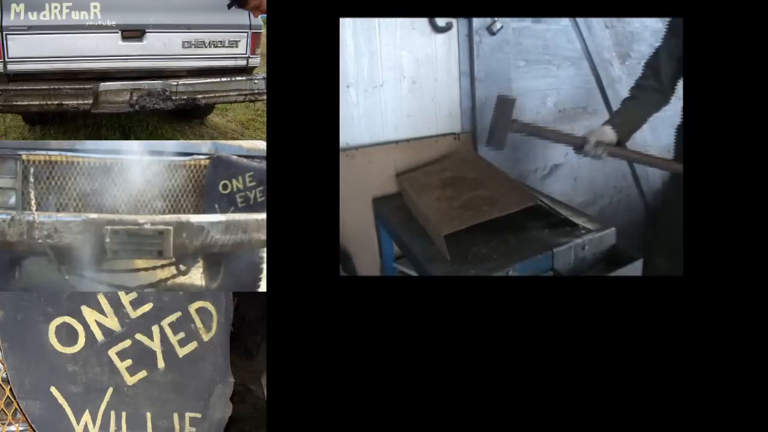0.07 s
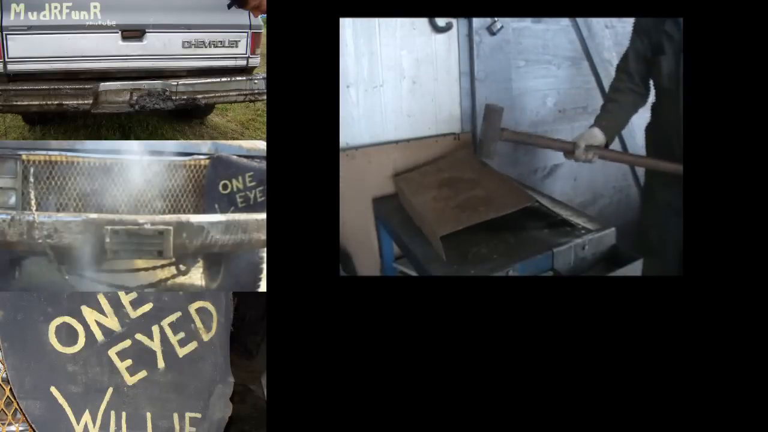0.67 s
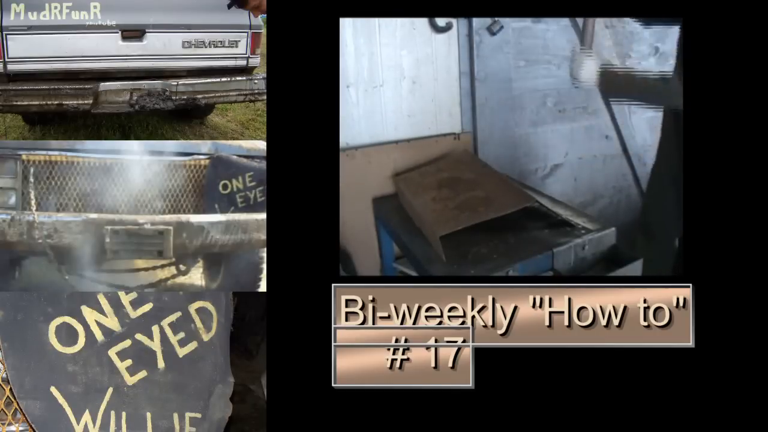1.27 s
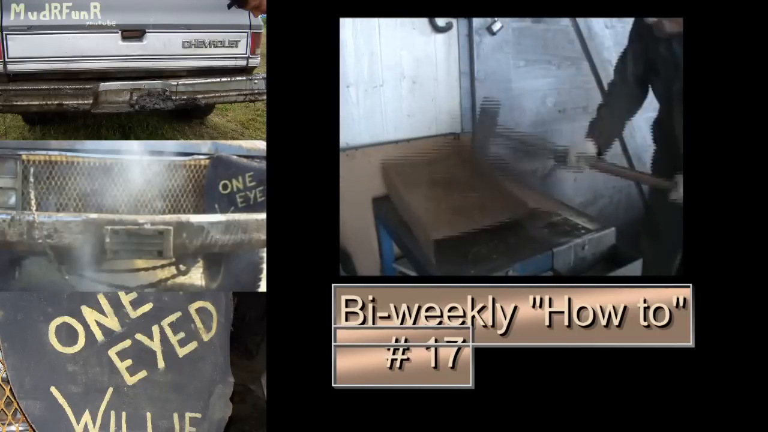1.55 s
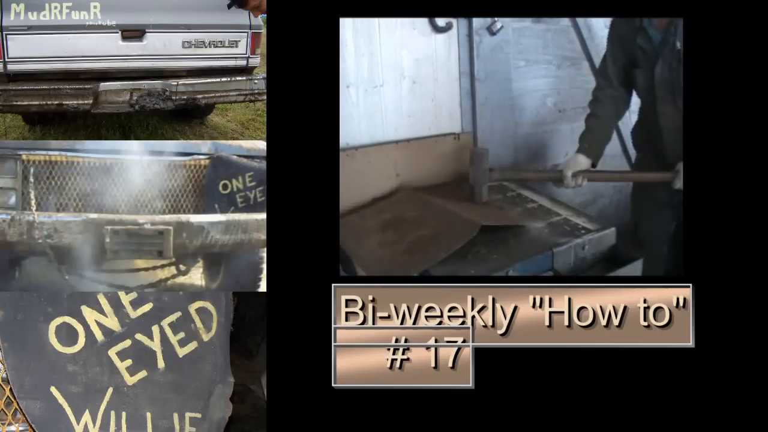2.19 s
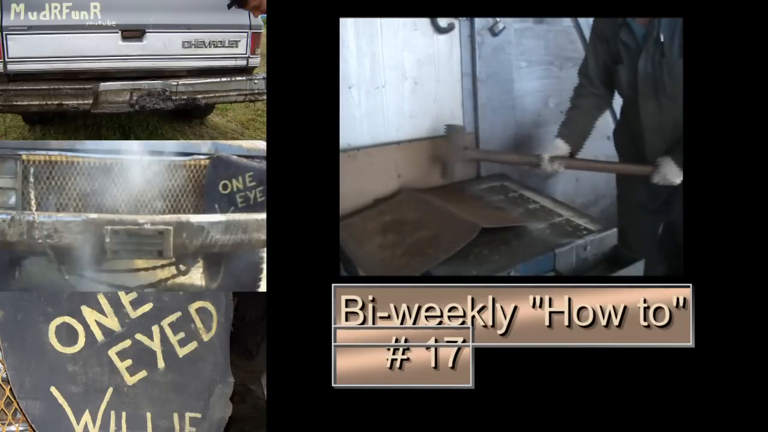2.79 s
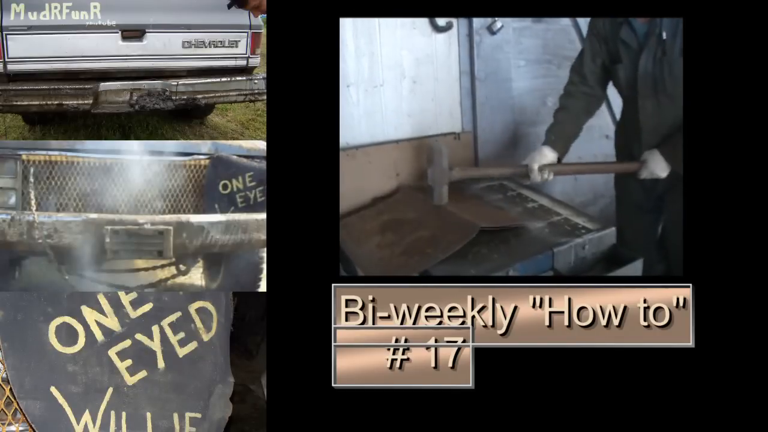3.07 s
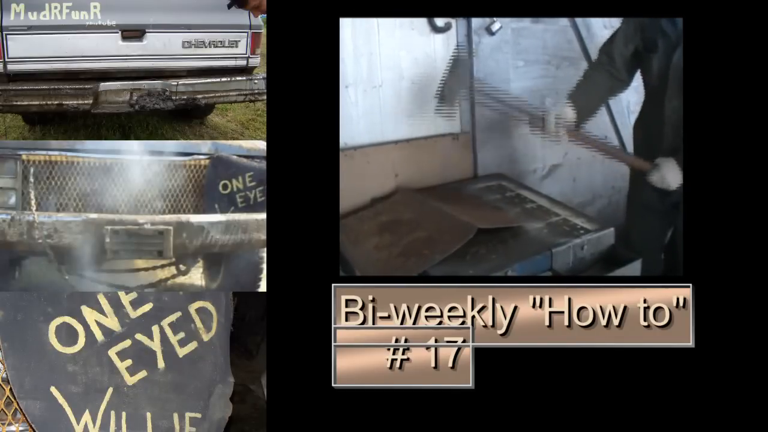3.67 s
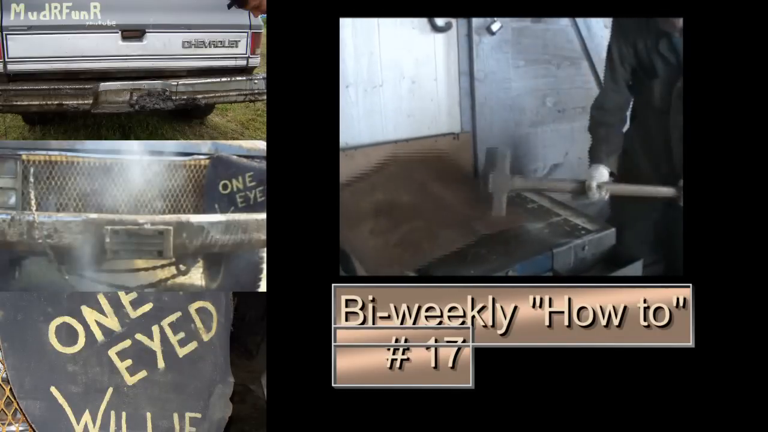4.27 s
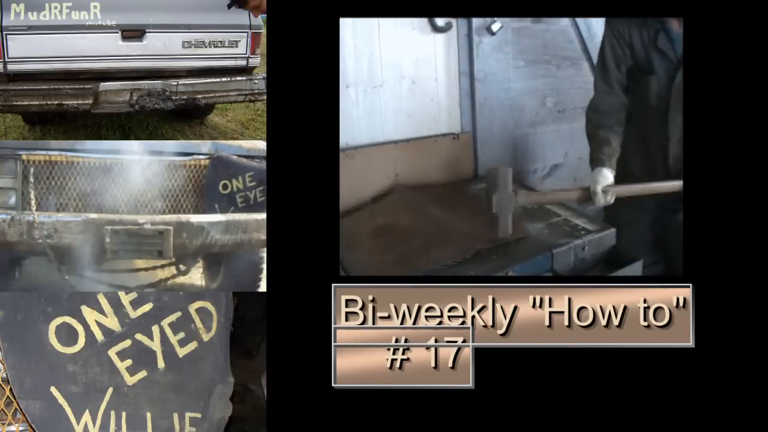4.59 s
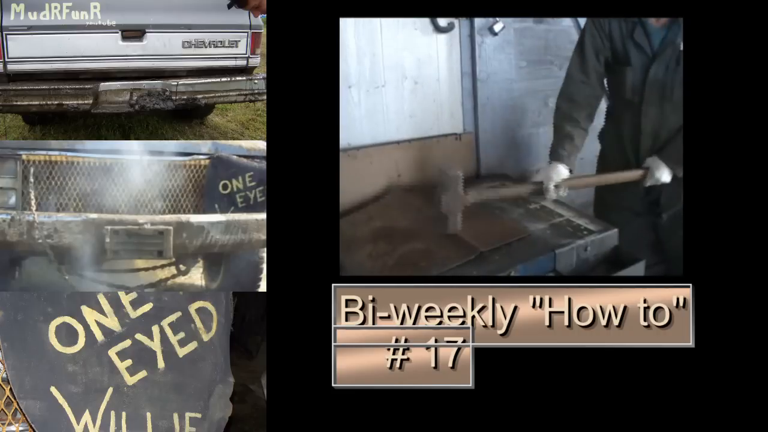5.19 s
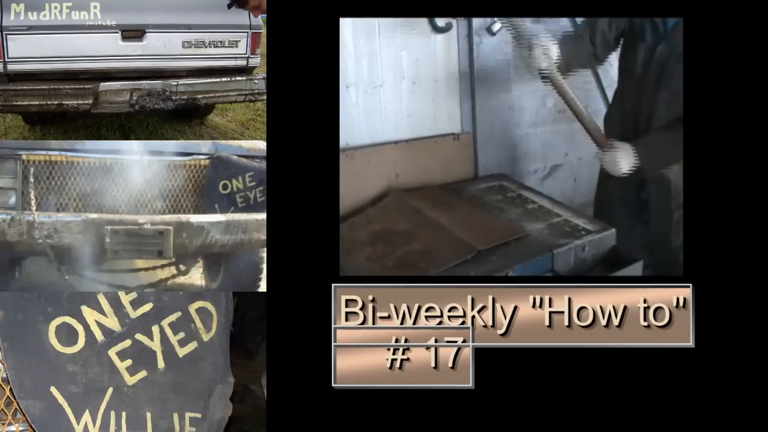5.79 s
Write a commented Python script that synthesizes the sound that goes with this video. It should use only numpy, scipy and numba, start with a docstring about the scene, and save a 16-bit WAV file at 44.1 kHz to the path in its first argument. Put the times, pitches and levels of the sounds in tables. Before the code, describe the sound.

A sledgehammer beats a steel sheet on a metal workbench in a small, hard-walled workshop. At about 0.3 seconds the first blow lands with a clear, ringing clang, followed by light knocks around 0.8. At 1.6 comes a loud, harsh crash; the sheet judders against the bench and clatters brightly, peaking just after 2 and settling by 2.6. A duller, weaker blow at 3.2 leaves small rattles until about 3.9. Another loud, ringing crash at 4.3 sets the sheet clattering and scraping until 5. The last blow lands at 5.2, with a few bounces and ringing that fades toward 6 seconds. The metal's pitch changes as it flattens. Each hit has a short room echo, and the loudest overload the microphone, sounding squashed and raspy. A jacket rustles very faintly with the swings over quiet room noise.

```python
"""A sledgehammer flattens a bent steel sheet on a metal workbench in a small, hard-walled workshop.
Each impact excites the modes of sheet and bench, and the sheet's modes change as it is beaten flat.
After each blow the sheet jumps and clatters; once it judders against the bench rail.
A jacket rustles with the swings over faint room noise. The loudest peaks overload the microphone,
and a limiter squashes the blows and lets the reverberation swell up."""
import sys
import numpy as np
from scipy import signal
from scipy.fft import rfft, irfft, next_fast_len
from scipy.io import wavfile
from scipy.ndimage import uniform_filter1d, minimum_filter1d
from numba import njit

SR = 44100
rng = np.random.default_rng(int(sys.argv[2]) if len(sys.argv) > 2 else 0)


def unload_audio(sound):
    """Save the sound as a 16-bit wav file, at the path given as the first command line argument."""
    columns = np.transpose(np.atleast_2d(sound))
    # keep every value between -1 and 1, then stretch to whole-number steps
    steps = np.round(np.clip(columns, -1, 1) * 32767)
    wavfile.write(sys.argv[1], SR, steps.astype(np.int16))


N = 266805

# Hammer blows; levels in all tables are relative. Each row: start in seconds, edge sizzle in dB,
# plate crash in dB, chatter time in seconds, bark in dB, clear ring in dB, thud in dB.
BLOWS = [(0.2911, -27, -21.5, 0.029, -7.5, -4.5, -31.5), (1.6014, 1.5, -5.5, 0.079, 3, -13.5, -35),
         (3.1836, -13.5, -17, 0.0081, -5.5, -17.5, -17.5), (4.294, -3.5, -11, 0.087, -4.5, -1.5, -44),
         (5.228, -6, -21, 0.047, -4, -18.5, -59.5)]
# The span of plate under the hammer. Each row: start in seconds, pitch in Hz, level in dB.
STRUCK_SPANS = [(.2905, 2270, -17), (1.6005, 357.2, -9.5), (3.1825, 1130, -36), (4.2935, 709, -19.5),
                (5.2275, 569, -11)]
# The handle knocking in the hammer's eye. Each row: start in seconds, level in dB.
HANDLE_KNOCKS = [(1.584, -50), (4.265, -49)]
# Loudest landings of sheet and hammer head. Each row: start in seconds, sizzle in dB, clang in dB.
LANDINGS = [(0.437, -25, -24.5), (0.5541, -32, -47.5), (0.777, -26, -29), (0.8064, -25, -19.5),
            (0.8204, -26, -31), (1.7795, -4.5, -24.5), (1.9266, -7.5, -31.5), (1.9713, -6, -31.5),
            (2.0033, -11.5, -30), (2.0272, 1, -19.5), (2.0604, 4, -6.5), (2.1485, 0, -31.5),
            (2.1855, -1.5, -19), (2.2511, -3.5, -40), (2.2778, -12, -43), (2.3246, -13.5, -35.5),
            (2.4083, -17.5, -32), (2.473, -18.5, -30.5), (2.5346, -18, -35), (2.5686, -24, -30.5),
            (3.0565, -33, -41), (3.2685, -17.5, -43), (3.3853, -16.5, -35), (3.5101, -24.5, -27),
            (3.6187, -21, -27.5), (3.6481, -14.5, -34.5), (3.6625, -15, -31.5), (3.683, -13, -35.5),
            (3.7739, -35, -29), (3.8524, -35.5, -36), (4.4143, -7, -11.5), (4.465, -1, -11.5),
            (4.5326, -7, -17.5), (4.5584, -1.5, -25), (4.6206, -10.5, -37), (4.6878, -13, -37.5),
            (4.748, -10.5, -43), (4.857, -12, -37.5), (4.8942, -11, -45), (4.9719, -12, -30),
            (5.3018, -4, -37), (5.3796, -7, -30), (5.4605, -13.5, -34.5), (5.5916, -26, -36.5)]
# Bouts of rattling. Each row: start in seconds, hold in seconds, edge level in dB, plate level in dB,
# added decay after the hold in dB per second.
RATTLE_BOUTS = [(0.342, 0.17, -44.5, -54, 61), (1.913, 0.32, -30, -32.5, 60.5),
                (3.188, 0.16, -35, -35, 172), (3.623, 0.11, -57, -38.5, 141),
                (4.373, 0.6, -29, -32.5, 276.5), (5.267, 0.14, -33, -31.5, 141)]
# Modes of the bent sheet, and long-ringing modes of the flat sheet and the bench frame.
# Each row: frequency in Hz, level in dB, time to decay by 60 dB (t60) in seconds.
BENT_MODES = [(334, -18, .7), (668, -6, .35), (834, -15, .65), (1007, -14, .6), (1104, -11, .65),
              (1270, -12, .6), (1572, -12, .6), (1717, -6, .6), (1793, 2.5, .45), (1927, -8, .45),
              (2288, 0, .28), (2460, -12, .55), (2719, -14, .5), (2805, -11, .55), (2988, -10, .4),
              (3230, -9, .48), (3844, -9, .32), (7800, -23, .2)]
FLAT_HUM_MODES = [(261, 0, 3.8), (1798, -2, 1.1), (2972, -2, 2.1)]
BENCH_MODES = [(262, -9, 2.4), (356, 3, 0.9), (484, -3, 4), (587, 1, 1.5), (667, 3, 1.7), (845, -1, 3),
               (1157, -1, 3), (1260, 2, 2.2), (1486, -5, 3), (1841, 1, 2.2)]
# Modes of the half-flattened sheet, the flat sheet and the rail. Each row: frequency in Hz, level in dB.
DENTED_MODES = [(355, 6), (484, 5), (587, 4.5), (748, 6.5), (1061, 5.5), (1093, 7), (1453, 6), (1626, 7),
                (1755, 7), (2175, 2), (3876, -6)]
FLAT_MODES = [(237, -20), (264, -21.5), (544, 4), (583, 10), (877, 10), (1094, 12), (1125, 14),
              (1152, -6.5), (1200, -13), (1448, 4.5), (1486, 8), (1690, 6.5), (1825, 2.5), (2019, 0),
              (2202, -17), (2800, -8.5), (3101, -11.5), (3327, -7.5), (3623, -28), (3688, -4.5)]
RAIL_MODES = [(1120, -44), (1324, -40), (1523, -35), (1707, -37), (1830, -39), (1997, -44), (2094, -34),
              (2455, -47), (2498, -47)]
# Dense modes of the plate, its edges hitting steel, the struck spot and the rail.
# Each row: frequency in Hz, spectral density in dB.
PLATE_SPECTRUM = [(40, -39), (110, -15.5), (190, -12), (255, 3.5), (300, -4.5), (355, 4.5), (440, 4.5),
                  (580, 7), (1100, 9.5), (2000, 3.5), (3000, -1), (4500, -6), (8000, -26), (16000, -76.5)]
EDGE_SPECTRUM = [(100, -38.5), (500, -27.5), (1500, -2.5), (3000, -7), (4700, -7.5), (6200, -3),
                 (7600, 1.5), (8700, -2.5), (10500, -13), (13000, -22.5), (16500, -39)]
SPOT_SPECTRUM = [(80, -22), (300, -24), (700, -4), (1200, 11.5), (2200, 9), (3200, -0.5), (5000, -20),
                 (15000, -41)]
RAIL_SPECTRUM = [(200, -17.5), (900, -3.5), (1600, 6), (2200, -4), (3000, -6), (10000, -41.5)]
# Reverberation of the workshop. Each row: frequency in Hz, t60 in seconds.
ROOM_T60 = [(80, 0.04), (300, 0.5), (1200, 0.43), (3000, 0.44), (8000, 0.2), (15000, 0.14)]
# Stereo width of the reverberation. Each row: frequency in Hz, side minus mid in dB.
ROOM_WIDTH = [(100, -4), (250, -9), (600, -10), (2000, -9.5), (4000, -13), (7500, -11), (9000, -2.5),
              (14000, -2.5)]
# Arm swings that rustle the jacket. Each row: fastest moment in seconds, level in dB.
SWINGS = [(0.02, -69.5), (0.98, -72), (1.17, -60.5), (1.53, -65), (3.95, -66), (4.25, -63), (5.959, -69.5)]
# Noise of rubbing cloth and of the quiet shop. Each row: frequency in Hz, spectral density in dB.
CLOTH_SPECTRUM = [(200, -21), (1000, 2), (4000, -8), (8000, -2.5), (11000, -14.5), (16000, -33.5)]
AIR_SPECTRUM = [(18, -64), (30, -29.5), (287, -4.5), (600, -3.5), (844, -2), (988, -9.5), (2010, -11),
                (7870, -15.5), (16000, -41.5)]

SHAPE_CHANGES_S = (1.55, 4.2)  # later impacts ring the dented, then the flat sheet


def hammer_blows():
    """Impact excitation: each blow drives the edges, plate and struck spot, and pushes the clear modes."""
    edge, plate, spot, push = np.zeros((4, N))
    for s, sizzle_db, crash_db, chatter_s, bark_db, ring_db, _ in BLOWS:
        add(edge, s, amp(sizzle_db) * chatter(chatter_s, spiky=0.046, after_db=-24.5, after_s=0.026))
        add(plate, s, amp(crash_db) * chatter(chatter_s, spiky=0.16, after_db=-25, after_s=0.017))
        add(spot, s, amp(bark_db) * chatter(0.0036, spiky=0.03, after_db=-32.5, after_s=0.03))
        add(push, s, amp([ring_db]))
    return np.array([edge, plate, push]), spot


def chatter(life_s, spiky, after_db, after_s, rise_s=0):
    """Intermittent contact: a swarm of tiny impacts breaks off and leaves dense modes shimmering."""
    t = np.arange(SR // 3) / SR
    swarm = unit(rng.standard_normal(len(t)) * np.exp(spiky * rng.standard_normal(len(t))))
    contact = np.exp(-(t / max(life_s, 0.001)) ** 2)
    shimmer = amp(after_db) * np.exp(-t / after_s)
    onset = 1 - np.exp(-t / max(rise_s, 1 / SR))  # an edge that rolls down swells in
    return swarm * np.hypot(contact, shimmer) * onset


def ringing(push, bent_db, dented_db, flat_db, hum_db, bench_db, bench_loss_db):
    """Free vibration: the sheet's shape sets its modes, and a flatter sheet rings the bench less."""
    shape = np.searchsorted(SHAPE_CHANGES_S, np.arange(N) / SR)
    shapes = [(BENT_MODES, bent_db),
              (damped(DENTED_MODES, t60=0.23, slope=0.23), dented_db),
              (damped(FLAT_MODES, t60=0.23, slope=0.38), flat_db)]
    sheet = sum(amp(db) * through(push * (shape == k), modal(modes, size=SR))
                for k, (modes, db) in enumerate(shapes))
    hum = through(push * (shape == 2), modal(FLAT_HUM_MODES, size=2 * SR))
    bench = through(push * amp(-bench_loss_db * shape), modal(BENCH_MODES, size=2 * SR))
    return sheet + amp(hum_db) * hum + amp(bench_db) * bench


def drumming(width, life_s):
    """Local resonance: each struck span rings in a narrow cluster of modes around its own pitch."""
    out, t = np.zeros(N), np.arange(SR // 2) / SR
    for s, hz, db in STRUCK_SPANS:
        band = signal.butter(2, [hz / (1 + width), hz * (1 + width)], "band", fs=SR, output="sos")
        cluster = unit(signal.sosfilt(band, rng.standard_normal(len(t))))
        add(out, s, amp(db) * cluster * np.exp(-t / life_s))
    return out


def thud(hz, life_s, gain_db):
    """Momentum transfer: the hammer's mass gives the bench one low push per blow."""
    out, t = np.zeros(N), np.arange(SR // 10) / SR
    for s, *_, db in BLOWS:
        add(out, s, amp(db + gain_db) * np.sin(2 * np.pi * hz * t) * np.exp(-t / life_s))
    return out


def handle_knocks():
    """Mechanical play: the handle knocks in the hammer's eye on the downswing."""
    drive = np.zeros(N)
    for s, db in HANDLE_KNOCKS:
        add(drive, s, amp(db) * chatter(0.062, spiky=0.3, after_db=-25, after_s=0.03))
    return drive


def clatter(landings, edge_db, plate_db):
    """Secondary impacts: each landing drives the edges, the plate and the clear modes."""
    edge, plate, push = np.zeros((3, N))
    for s, sizzle_db, clang_db in landings:
        buzz_s = 0.008 * amp(0.55 * (sizzle_db + 23))  # harder landings chatter for longer
        sizzle = chatter(buzz_s, spiky=0.57, after_db=-7.5, after_s=0.03, rise_s=0.00057)
        clang = chatter(0.015, spiky=0.17, after_db=-7.5, after_s=0.029, rise_s=0.0052)
        add(edge, s, amp(sizzle_db + edge_db) * sizzle)
        add(plate, s, amp(clang_db + plate_db) * clang)
        add(push, s, amp([clang_db]))
    return np.array([edge, plate, push])


def rattle_levels(attack_s, sag_db_per_s):
    """Dissipation: in each bout the edge and plate gains swell, sag as energy is lost, then die away."""
    gains = np.zeros((2, N))
    for start, hold, edge_db, plate_db, release in RATTLE_BOUTS:
        t = np.maximum(np.arange(N) / SR - start, 0)
        fade_db = sag_db_per_s * t + release * np.maximum(t - hold, 0)
        gains += amp([[edge_db], [plate_db]]) * np.minimum(t / attack_s, 1) * amp(-fade_db)
    return gains


def bounces(levels, per_s, jitter, scatter_db, edge_db, plate_db):
    """Irregular rebound: small landings, in rows like LANDINGS, follow the strength of the rattle."""
    chance = rng.standard_normal((400, 3))
    times = (np.arange(len(chance)) + jitter * chance[:, 0]) / per_s
    inside = (times > 0) & (times < N / SR)
    gains = levels[:, (times[inside] * SR).astype(int)].T
    db = 20 * np.log10(gains + 1e-9) - scatter_db * chance[inside, 1:]
    audible = db.max(1) > -65
    return np.column_stack([times[inside], db + [edge_db, plate_db]])[audible]


def sliding(levels, edge_db, plate_db, ring_db):
    """Sliding friction: steel grinding on steel drives edges, plate and clear modes with noise."""
    edge, plate = levels
    gains = amp([[edge_db], [plate_db], [ring_db]]) * np.array([edge, plate, plate])
    return gains * rng.standard_normal((3, N))


def judder(hit_s, rebound_s, gap_s, loss_db, count):
    """Elastic rebound: the sheet hits the rail, springs back once, then knocks ever more weakly."""
    knocks, rasp = np.zeros((2, N))
    second_hit_s = hit_s + rebound_s
    shudder = [(second_hit_s + (k + 1) * gap_s, -26.5 - k * loss_db) for k in range(count)]
    for s, db in [(hit_s, -17), (second_hit_s, -15.5)] + shudder:
        add(knocks, s, amp([db]))
        add(rasp, s, amp(db) * chatter(0.0058, spiky=0.075, after_db=-20, after_s=0.022))
    rail = modal(damped(RAIL_MODES, t60=0.17, slope=0.1), size=SR // 2)
    return amp(3.5) * through(knocks, rail) + amp(12) * resonant(rasp, RAIL_SPECTRUM)


def modal(modes, size):
    """Superposition: the impulse response is a sum of decaying sines, starting near rms 1."""
    t = np.arange(size, dtype=np.float32) / SR
    hz, db, t60 = np.float32(modes).T[:, :, None]
    sign = rng.choice([-1, 1], hz.shape).astype(np.float32)
    waves = sign * amp(db - 60 * t / t60) * np.sin(2 * np.pi * hz * t)
    return waves.sum(0) / np.sqrt(np.sum(amp(db) ** 2) / 2)


def damped(modes, t60, slope):
    """Damping grows with frequency: modes last t60 seconds at 1 kHz, and less above."""
    return [(hz, db, t60 * (hz / 1000) ** -slope) for hz, db in modes]


def resonant(x, spectrum):
    """Modal overlap: dense modes act as one minimum-phase filter, here of unit energy."""
    size = 4096
    gain = amp(along(spectrum, np.fft.rfftfreq(size, 1 / SR)))
    cepstrum = irfft(np.log(gain))
    cepstrum[1:size // 2] *= 2  # folding the cepstrum makes the response causal
    cepstrum[size // 2 + 1:] = 0
    response = irfft(np.exp(rfft(cepstrum)))
    return through(x, response / np.linalg.norm(response))


def radiated(x, corner_hz):
    """Acoustic short circuit: air slips round the open sheet, so its lowest tones hardly carry."""
    return signal.sosfilt(signal.butter(3, corner_hz, "high", fs=SR, output="sos"), x)


def workshop(x, wet_db, left_db):
    """Reverberation: sound from the left gains the diffuse, smoothly dying echo of a small hard room."""
    step, size = SR // 4, 2 * SR // 3  # a fresh tail every quarter second keeps the echo less tonal
    starts = range(0, N, step)
    mids = room_tails(len(starts), size)
    sides = coloured(room_tails(len(starts), size), ROOM_WIDTH)
    build_up = amp(wet_db) * (1 - np.exp(-np.arange(mids.shape[1]) / SR / 0.0047))
    mid, side = x.copy(), np.zeros(N)
    for i, mid_tail, side_tail in zip(starts, mids, sides):
        add(mid, i / SR, signal.fftconvolve(x[i:i + step], build_up * mid_tail))
        add(side, i / SR, signal.fftconvolve(x[i:i + step], build_up * side_tail))
    return np.array([mid + side, mid - side]) * amp([[left_db / 2], [-left_db / 2]])


def room_tails(count, size):
    """Diffuse field: noise-like echoes of unit energy, each band decaying at its own rate."""
    hz, t, bands = signal.stft(rng.standard_normal((count, size)), SR, nperseg=256)
    decay = amp(-60 * t / along(ROOM_T60, hz)[:, None])
    _, tails = signal.istft(bands * decay, SR, nperseg=256)
    return tails / np.linalg.norm(tails, axis=1, keepdims=True)


def jacket(swing_s):
    """Friction noise, as mid and side: rubbing cloth swells and fades with each swing."""
    t = np.arange(N) / SR
    envelope = sum(amp(db) * np.exp(-((t - s) / swing_s) ** 2) for s, db in SWINGS)
    return envelope * unit(coloured(rng.standard_normal((2, N)), CLOTH_SPECTRUM))


def shop_air(gain_db):
    """Ambient noise, as mid and side: the steady floor of the quiet shop."""
    return amp(gain_db) * unit(coloured(rng.standard_normal((2, N)), AIR_SPECTRUM))


def overloaded(x, threshold, rasp_db, band_hz):
    """Nonlinear distortion: peaks rasp in the two capsules with opposite signs, widening the crash."""
    excess = np.maximum(np.abs(x.mean(0)) - threshold, 0)
    rasp = signal.sosfilt(signal.butter(2, band_hz, "band", fs=SR, output="sos"), excess)
    return x + amp(rasp_db) * np.array([rasp, -rasp])


def limited(x, ceiling, attack_s, release_s):
    """Peak limiting: the gain falls just before the peaks exceed the ceiling."""
    peak = follower(np.abs(x).max(0), 1 / (attack_s * SR), 1 / (release_s * SR))
    peak = -minimum_filter1d(-peak, size=49)  # half a millisecond of look-ahead
    return x * uniform_filter1d(ceiling / np.maximum(peak, ceiling), size=49)


@njit
def follower(level, attack, release):
    """Envelope detection: the held level rises fast and sinks slowly."""
    out, held = np.empty_like(level), 0.0
    for i in range(len(level)):
        held += (level[i] - held) * (attack if level[i] > held else release)
        out[i] = held
    return out


def amp(db):
    """Amplitude ratio of a level in decibels."""
    return 10 ** (np.asarray(db) / 20)


def unit(x):
    """Normalisation to rms 1."""
    return x / np.sqrt(np.mean(x ** 2) + 1e-20)


def along(points, hz):
    """Interpolation of (Hz, value) points on a log frequency axis."""
    frequencies, values = np.transpose(points)
    return np.interp(np.log(hz + 1), np.log(frequencies), values)


def coloured(x, spectrum):
    """Zero-phase filtering by a (Hz, dB) spectrum."""
    n = x.shape[-1]
    size = next_fast_len(n + SR // 10, True)
    gain = amp(along(spectrum, np.fft.rfftfreq(size, 1 / SR)))
    return irfft(rfft(x, size) * gain, size)[..., :n]


def add(track, s, sound):
    """Superposition of a sound on a track, from s seconds on."""
    part = track[max(round(s * SR), 0):][:len(sound)]
    part += sound[:len(part)]


def through(x, response):
    """Convolution with an impulse response."""
    return signal.fftconvolve(x, response, axes=-1)[..., :N]


def scene():
    """Source and filter: contact forces drive the steel, which radiates into the workshop."""
    levels = rattle_levels(attack_s=0.013, sag_db_per_s=12)
    small_landings = bounces(levels, per_s=24, jitter=0.3, scatter_db=0.5, edge_db=15, plate_db=1)
    blows, spot = hammer_blows()
    landings = clatter([*LANDINGS, *small_landings], edge_db=-11.5, plate_db=-2.5)
    handle = handle_knocks()
    edge, plate, push = blows + landings + sliding(levels, edge_db=-7, plate_db=0.5, ring_db=-18)
    crash = resonant(edge, EDGE_SPECTRUM) + resonant(plate + handle, PLATE_SPECTRUM)
    crash += resonant(spot, SPOT_SPECTRUM) + drumming(width=0.07, life_s=0.019)
    tones = judder(hit_s=1.7951, rebound_s=0.012, gap_s=0.026, loss_db=1.1, count=4)
    tones += ringing(push, bent_db=-17.5, dented_db=-12.5, flat_db=-8.5,
                     hum_db=-46.5, bench_db=-35.5, bench_loss_db=9)
    metal = radiated(crash, corner_hz=81) + radiated(tones, corner_hz=186)
    hammering = workshop(metal + thud(hz=55, life_s=0.0027, gain_db=-17), wet_db=-5, left_db=1.8)
    mid, side = shop_air(gain_db=-69.5) + jacket(swing_s=0.11)
    return hammering + np.array([mid + 0.55 * side, mid - 0.37 * side])


def record(dry):
    """Finite headroom and bandwidth: the signal overloads, is limited, saturates and is low-passed."""
    x = overloaded(dry, threshold=0.38, rasp_db=-5.5, band_hz=(170, 6000))
    x = limited(x, ceiling=0.42, attack_s=0.00018, release_s=0.13)
    x = x / (1 + (x / 0.37) ** 8) ** (1 / 8)  # soft clipping rounds off the remaining peaks
    size = next_fast_len(N + SR // 10, True)
    passband = np.fft.rfftfreq(size, 1 / SR) < 17000
    return irfft(rfft(x, size) * passband, size)[:, :N]


dry = scene()
out = record(dry)
unload_audio(out)
```